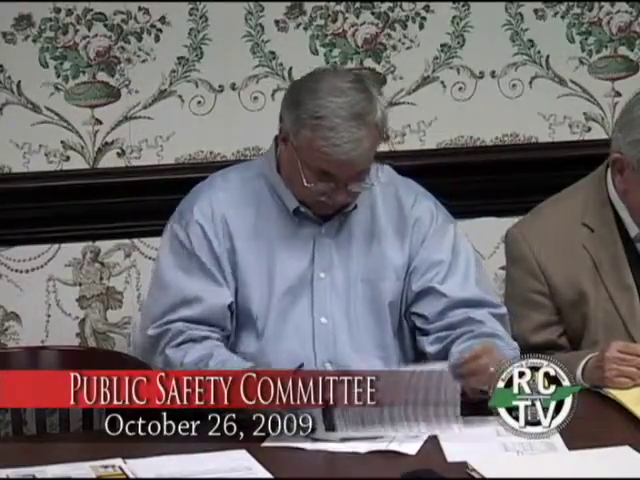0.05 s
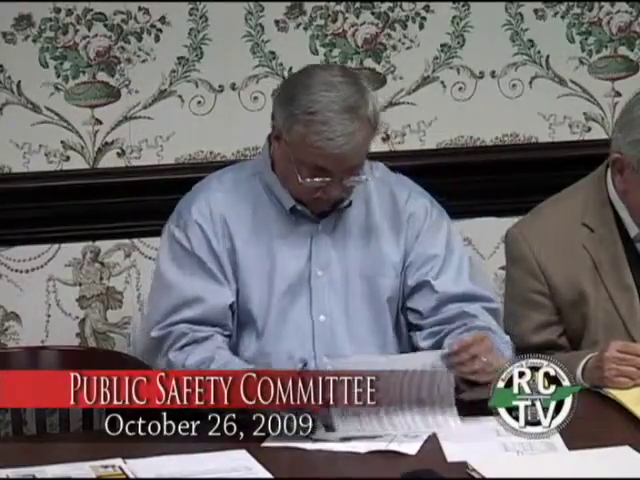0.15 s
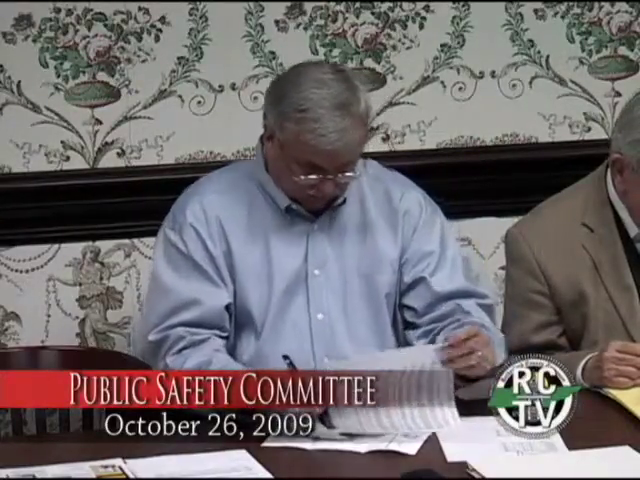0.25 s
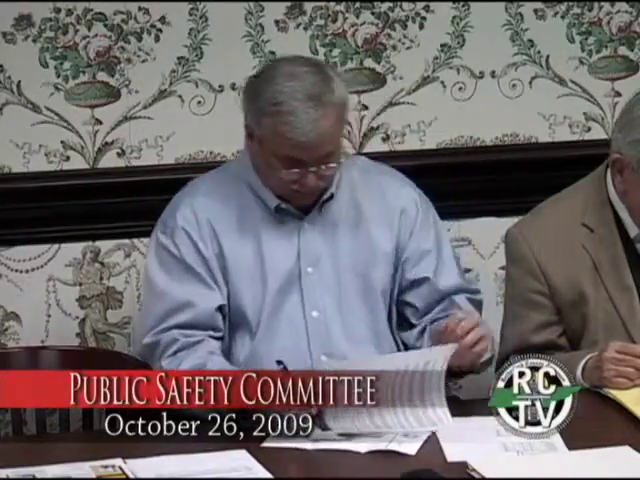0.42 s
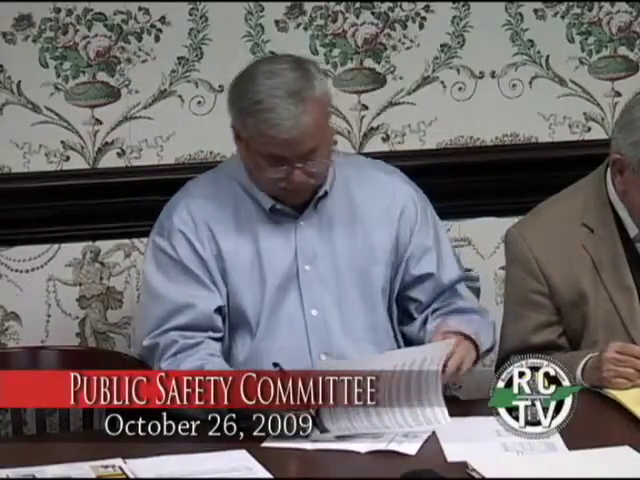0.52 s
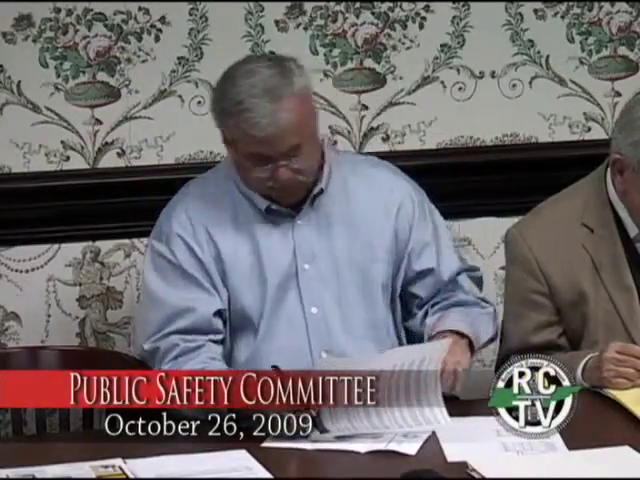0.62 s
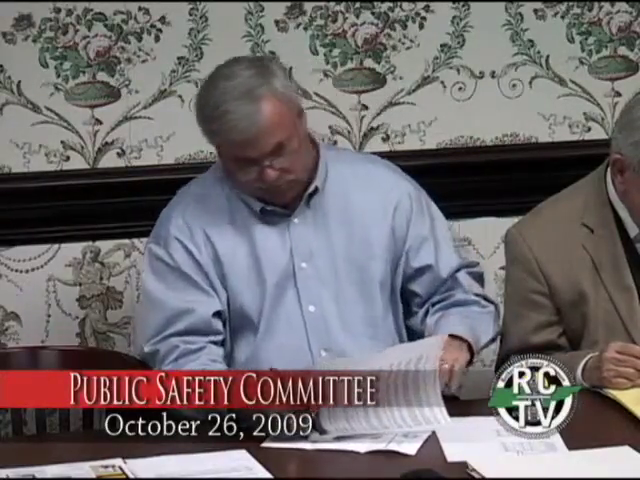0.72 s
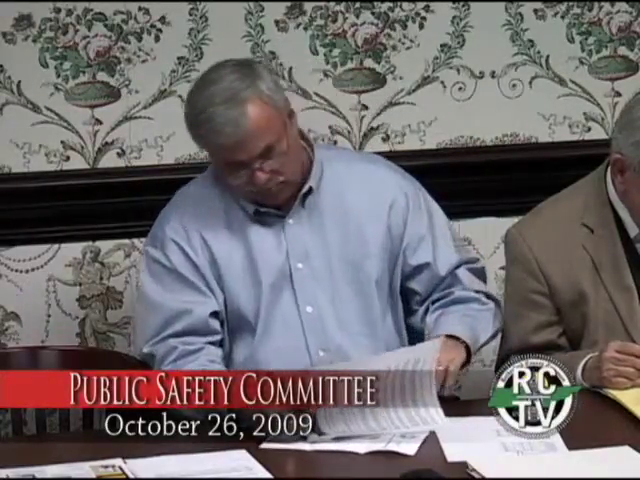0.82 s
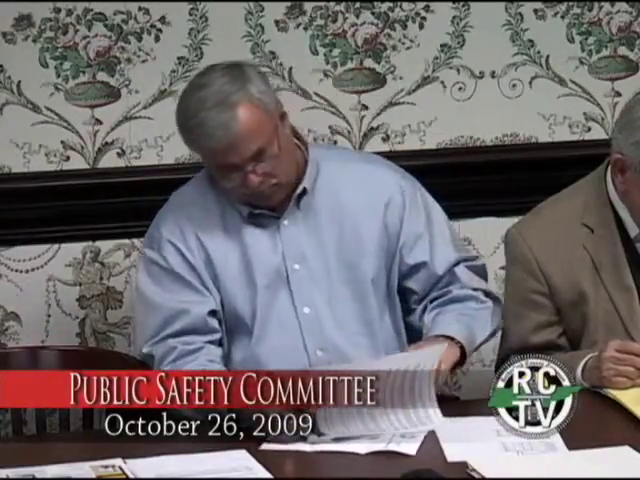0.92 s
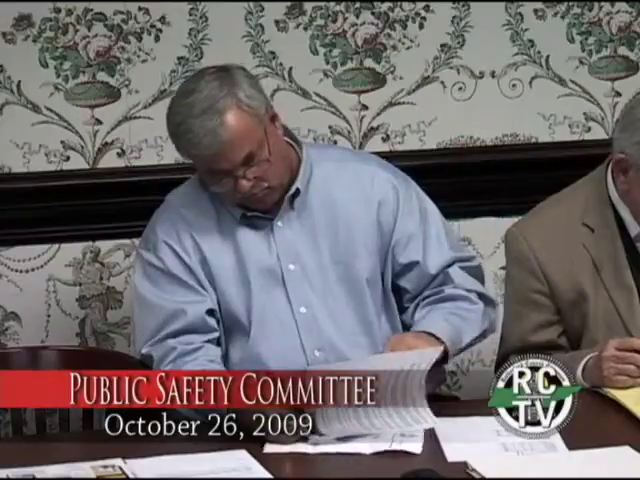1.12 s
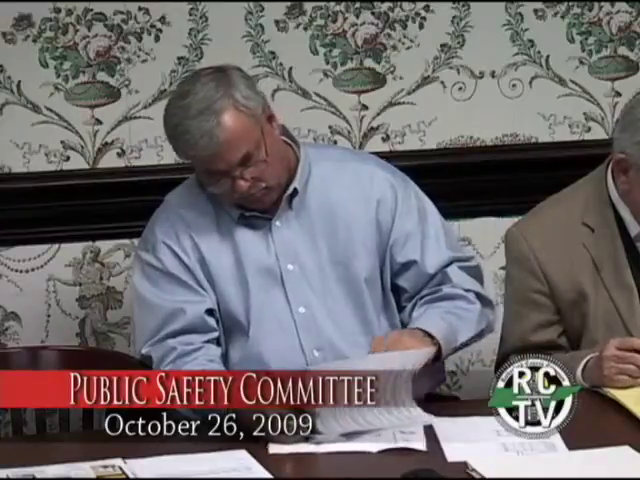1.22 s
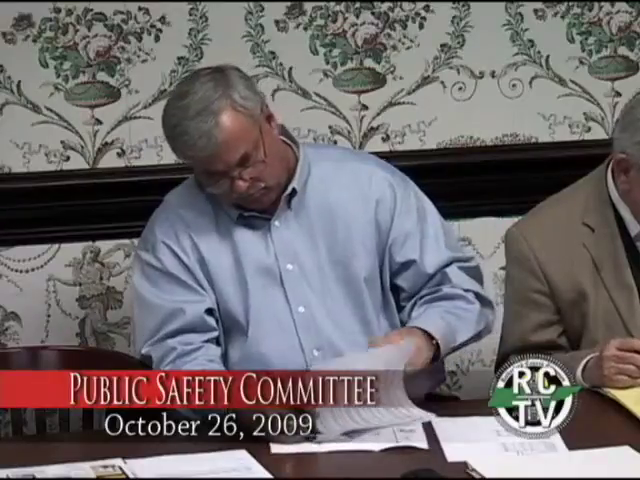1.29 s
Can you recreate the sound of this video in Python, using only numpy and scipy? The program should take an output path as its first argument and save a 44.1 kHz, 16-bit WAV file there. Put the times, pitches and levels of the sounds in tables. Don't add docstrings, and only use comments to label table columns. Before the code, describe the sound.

Sheets of paper slide softly on a table, snap sharply once, flap and crinkle, then pause before more sliding and light table knocks; close microphone in a meeting room with faint buzz and ventilation.

```python
import sys
import numpy as np
from scipy import signal
from scipy.fft import rfft, irfft, next_fast_len
from scipy.io import wavfile
from scipy.ndimage import uniform_filter1d, map_coordinates

SR = 44100
rng = np.random.default_rng(int(sys.argv[2]) if len(sys.argv) > 2 else 0)


def wav_record(signal):
    frames = np.transpose(np.atleast_2d(signal))
    bounded = np.clip(frames, -1, 1)
    quanta = np.round(bounded * 32767).astype(np.int16)
    wavfile.write(sys.argv[1], SR, quanta)


def voltage_ratio(level):
    return 10 ** (np.asarray(level, float) / 20)


N = 59535


def unit(x):
    return x / np.sqrt(np.mean(x ** 2) + 1e-20)


def along(points, hz):
    point_hz, value = np.transpose(points)
    return np.interp(np.log(hz + 1), np.log(point_hz + 1), value)


def wobble(rate):
    return map_coordinates(rng.standard_normal(400), [np.arange(N) * rate / SR])


def filtered(x, response):
    size = next_fast_len(len(x) + 8192)
    hz = np.fft.rfftfreq(size, 1 / SR)
    return irfft(rfft(x, size) * response(hz), size)[:len(x)]


def coloured(x, spectrum):
    return unit(filtered(x, lambda hz: voltage_ratio(along(spectrum, hz)) * (hz > 15)))


def band(x, hz, q):
    def response(f):
        damping = 1j * f * hz / q
        return damping / (hz * hz - f * f + damping)
    return filtered(x, response)


def patchy(patchy_db):
    z = signal.stft(rng.standard_normal(N), nperseg=256)[2]
    field = uniform_filter1d(rng.standard_normal(z.shape), 5, 0)
    field = uniform_filter1d(field, 8, 1)
    return signal.istft(z * voltage_ratio(patchy_db * unit(field)), nperseg=256)[1][:N]


def add(track, start_s, sound):
    i = max(round(start_s * SR), 0)
    track[i:i + len(sound)] += sound[:len(track) - i]


# start_s, end_s, level_db (rms), pitch_hz of the scrape, rise_s
STROKE_TABLE = [(-.05, 0.025, -52.5, 6600, .01), (-.05, 0.04, -57.5, 1852, .01),
                (0.026, 0.129, -57, 5400, 0.014), (0.099, 0.166, -54.5, 7100, 0.0055),
                (0.098, 0.194, -55.5, 1560, 0.0065), (0.145, 0.2, -49, 3800, 0.032),
                (0.184, 0.354, -60.5, 3230, 0.0081), (0.37, 0.418, -78, 1730, 0.0083),
                (0.415, 0.485, -63, 8400, 0.015), (0.433, 0.485, -60, 5500, 0.015),
                (0.77, .83, -59, 2520, 0.0048), (0.759, 1.03, -61.5, 6360, 0.0036),
                (0.853, 0.963, -55.5, 2140, 0.013), (0.858, 0.953, -60, 5640, 0.027),
                (1.003, 1.05, -52.5, 2500, 0.025), (1.016, 1.142, -52, 5600, 0.017),
                (1.04, 1.107, -43, 3320, 0.016), (1.062, 1.183, -46, 2040, 0.0085),
                (1.108, 1.171, -46, 3360, 0.024), (1.167, 1.263, -50.5, 2600, 0.017),
                (1.163, 1.333, -60, 8250, 0.018), (1.258, 1.325, -46, 2040, .006),
                (1.26, 1.325, -58.5, 3930, 0.0091)]
# pitch_ratio (frequency over pitch), level_db (per Hz)
SCRAPE_COLOUR = [(.05, -26), (.25, -16), (.6, -7), (.85, -1), (1.15, 0), (1.6, -6), (3, -12), (6, -24)]
GRAINS_PER_S, GRAIN_SPREAD_DB, GRAIN_DB = 1500, 2.5, -5
STROKE_FADE_S = .016


def slide():
    t, out = np.arange(N) / SR, np.zeros(N)
    for start_s, end_s, level_db, pitch_hz, rise_s in STROKE_TABLE:
        chance, size = rng.random((2, N))
        sign = np.sign(size % .1 - .05)
        ticks = (chance < GRAINS_PER_S / SR) * voltage_ratio(-GRAIN_SPREAD_DB * np.log(size + .02)) * sign
        friction = unit(patchy(patchy_db=3.5)) + voltage_ratio(GRAIN_DB) * unit(ticks)
        spectrum = [(ratio * pitch_hz, db) for ratio, db in SCRAPE_COLOUR] + [(40000, -74)]
        scrape = coloured(friction, spectrum)
        rise = np.clip((t - start_s) / rise_s, 0, 1)
        fade = np.exp(-np.clip(t - end_s, 0, None) / STROKE_FADE_S)
        hand_db = 0.64 * wobble(35) + 0.28 * wobble(110)
        out += voltage_ratio(level_db + hand_db) * rise * fade * scrape
    return out


# pitch_hz, level_db
BUZZ_COLOUR = [(150, -16), (500, -6), (1000, -8), (2000, -4), (3000, -10), (5000, -18), (9000, -34)]
# mains_multiple, level_db (rms)
HUM_PARTIALS = [(1, -71), (2, -75), (3, -68), (5, -73), (9, -76)]
MAINS_HZ, SWITCH_S = 60, .6021
BUZZ_DB, UNEVEN = -66.5, .1


def wiring():
    t, steps = np.arange(N) / SR, np.zeros(N)
    half_cycle = np.arange(-72, 89)
    at = np.round((SWITCH_S + half_cycle / (2 * MAINS_HZ)) * SR).astype(int)
    steps[at] = ((-1.) ** half_cycle - UNEVEN) * voltage_ratio(.7 * rng.standard_normal(len(half_cycle)))
    buzz = unit(filtered(steps, lambda hz: -1j * voltage_ratio(along(BUZZ_COLOUR, hz)) * (hz > 100)))
    hum = np.zeros(N)
    for multiple, level_db in HUM_PARTIALS:
        phase = 2 * np.pi * multiple * MAINS_HZ * (t - SWITCH_S) + np.pi * .75
        hum += voltage_ratio(level_db + 5.5 + 1.7 * wobble(12.9)) * np.cos(phase)
    return voltage_ratio(BUZZ_DB) * buzz + hum


# pitch_hz, level_db (per Hz)
AIR_COLOUR = [(20, -6), (60, -11.5), (150, -9.5), (240, -15), (1000, -19), (3000, -31.5), (8000, -40.5),
              (15500, -47.5)]
AIR_DB = -59.5


def ventilation():
    return voltage_ratio(AIR_DB + wobble(8.1)) * coloured(patchy(patchy_db=2.5), AIR_COLOUR)


def whistle():
    hz, level_db = 15734.3, -87.5
    return voltage_ratio(level_db) * np.sqrt(2) * np.sin(2 * np.pi * hz * np.arange(N) / SR)


# start_s, level_db (peak), pitch_hz, t60_s
SNAP_TABLE = [(.107, -48, 500, .02), (.2175, -21, 480, .014), (.21755, -16, 1250, .005),
              (.2184, -18, 1700, .007), (.2196, -14.5, 2250, .006), (.2213, -26, 1750, .016),
              (.2495, -30, 850, .012), (.2538, -29, 4800, .008), (.2549, -28, 3300, .008),
              (.2561, -26, 1700, .012), (.2757, -32, 1400, .014), (.2874, -28, 650, .009),
              (.3008, -32, 1500, .016), (.3435, -41, 600, .008), (.3565, -36, 2250, .03),
              (.3595, -36, 2350, .025), (.5845, -50, 750, .045), (.7577, -48, 1700, .01),
              (.78, -47, 6000, .005), (.799, -42, 2300, .01), (.907, -47, 2100, .006),
              (1.153, -35, 3000, .006), (1.229, -33, 750, .009), (1.2296, -39, 2200, .005),
              (1.259, -42, 1400, .006), (1.3207, -37, 2500, .005)]
PUSH_DB, PUSH_HZ, PUSH_T60_S = -7.5, 193, 0.013
CRACK_DB, CRACK_T60_S, CRACK_OVER = -14, .003, 2.4


def snaps():
    out, t = np.zeros(N), np.arange(4096) / SR
    for start_s, level_db, pitch_hz, t60_s in SNAP_TABLE:
        noise = rng.standard_normal((2, len(t)))
        rough = unit(band(band(noise[0], pitch_hz, 2.5), pitch_hz, .7))
        ring = voltage_ratio(-60 * t / t60_s + 3) * (-np.sin(2 * np.pi * pitch_hz * t) + .45 * rough)
        crack = voltage_ratio(CRACK_DB - 60 * t / CRACK_T60_S) * unit(band(noise[1], CRACK_OVER * pitch_hz, .8))
        push = voltage_ratio(PUSH_DB - 60 * t / PUSH_T60_S) * np.sin(2 * np.pi * PUSH_HZ * t)
        add(out, start_s, voltage_ratio(level_db) * (ring + crack + push))
    return out


# middle_s, level_db (rms), pitch_hz, half_length_s
FLAP_TABLE = [(0.226, -53, 1260, 0.011), (0.251, -34.5, 940, 0.0097), (.255, -31.5, 4050, 0.0014),
              (0.259, -38, 1910, 0.0037), (0.284, -45, 1250, 0.021), (0.298, -45, 1140, 0.0043),
              (0.3, -62, 1700, 0.0037), (0.324, -42.5, 4600, 0.0032), (0.336, -43.5, 2040, 0.0046),
              (0.352, -42, 5400, 0.0051), (0.286, -36, 654, 0.0078), (0.264, -41, 1510, 0.0045),
              (0.359, -41.5, 2150, 0.0063), (0.383, -48.5, 523, 0.0038), (0.499, -61, 1920, 0.012),
              (.59, -79, 696, 0.0028), (.765, -53, 1830, 0.003), (0.811, -52.5, 2300, 0.013),
              (0.866, -54, 1080, .012), (0.118, -60.5, 298, 0.0093)]
FLAP_Q, FLAP_HISS_DB = 1.7, -13


def flaps():
    out, t = np.zeros(N), np.arange(-2048, 2048) / SR
    for middle_s, level_db, pitch_hz, half_length_s in FLAP_TABLE:
        noise = rng.standard_normal((3, len(t)))
        lumps = noise[0] * voltage_ratio(4.3 * unit(uniform_filter1d(noise[1], 40)))
        crinkle = unit(band(band(lumps, pitch_hz, FLAP_Q), pitch_hz, .35))
        hiss = voltage_ratio(FLAP_HISS_DB) * unit(band(noise[2], 5500, .8))
        swell = np.exp(-.5 * (t / half_length_s) ** 2)
        add(out, middle_s + t[0], voltage_ratio(level_db) * swell * (crinkle + hiss))
    return out


# start_s, level_db (peak), pitch_hz
THUD_TABLE = [(.549, -40.5, 142), (0.559, -57, 139), (0.72, -45.5, 139), (0.793, -46, 143),
              (0.851, -41, 143), (1.068, -40.5, 104), (1.12, -36, 162.5), (1.169, -40.5, 135),
              (1.274, -35.5, 57.4), (0.309, -37, 95), (0.382, -46, 114)]
THUD_T60_S, THUD_RISE_S = 0.066, 0.009


def thuds():
    out, t = np.zeros(N), np.arange(6000) / SR
    for start_s, level_db, pitch_hz in THUD_TABLE:
        decay = voltage_ratio(level_db - 60 * t / THUD_T60_S + 1)
        rise = 1 - np.exp(-t / THUD_RISE_S)
        add(out, start_s, -decay * rise * np.sin(2 * np.pi * pitch_hz * t))
    return out


# pitch_hz, t60_s
ROOM_DECAY = [(150, 0.45), (1500, 0.23), (10000, 0.48)]


def room(x):
    hz, t, z = signal.stft(rng.standard_normal(SR // 2), SR, nperseg=256)
    decay = voltage_ratio(-60 * t / along(ROOM_DECAY, hz)[:, None])
    tail = signal.istft(z * decay, SR, nperseg=256)[1]
    late = np.pad(x, (200, 0))
    return signal.fftconvolve(late, tail / np.linalg.norm(tail))[:N]


def scene():
    wet_db = -9
    paper = snaps() + flaps() + thuds()
    background = ventilation() + wiring()
    return (paper + voltage_ratio(wet_db) * room(paper) + slide() + background)[None]


def band_limit(x):
    return signal.sosfilt(signal.butter(12, 16410, fs=SR, output="sos"), x)


# pitch_hz, level_db
MIC_COLOUR = [(25, -17), (50, 0.5), (11000, -1), (13500, -5.5), (15900, -15)]
TOP_HZ = 16000


def record(dry):
    heard = filtered(dry[0], lambda hz: (hz < TOP_HZ) * voltage_ratio(along(MIC_COLOUR, hz)))
    return band_limit((heard + whistle())[None])


dry = scene()
out = record(dry)
wav_record(out)
```